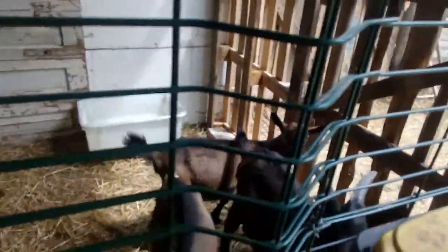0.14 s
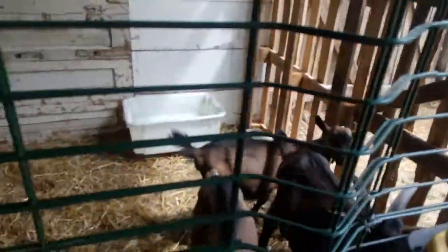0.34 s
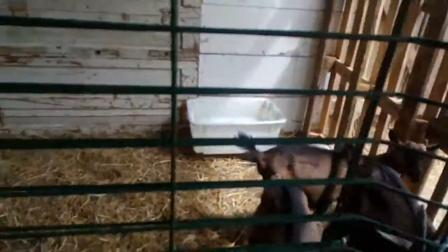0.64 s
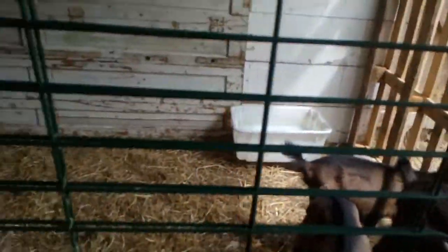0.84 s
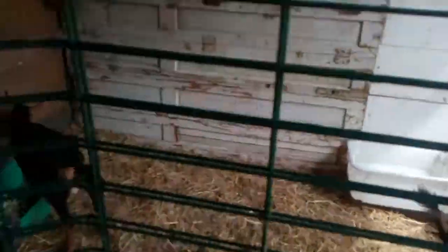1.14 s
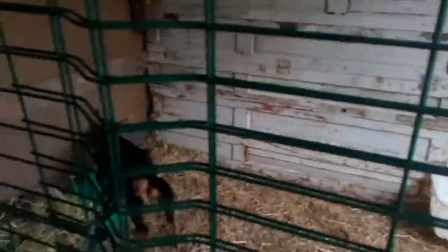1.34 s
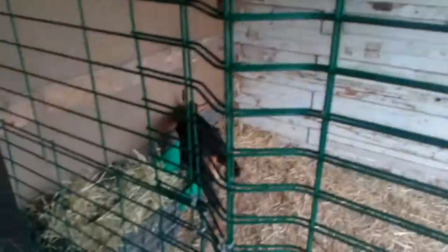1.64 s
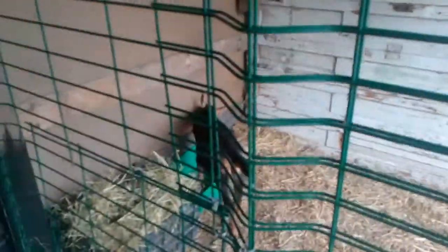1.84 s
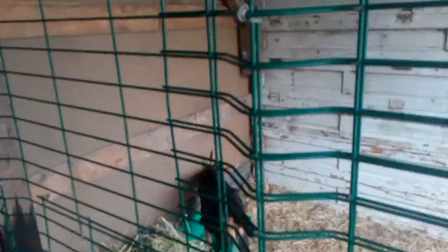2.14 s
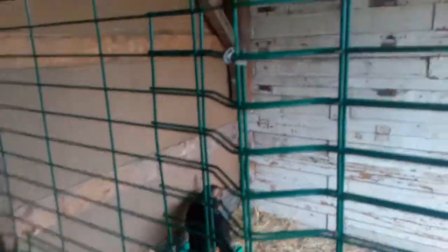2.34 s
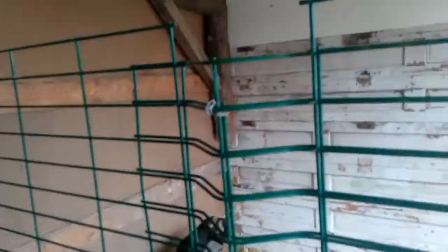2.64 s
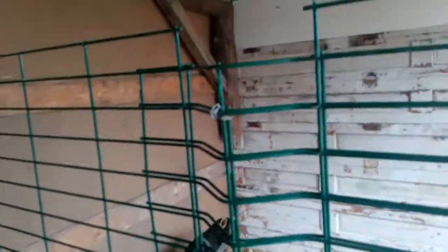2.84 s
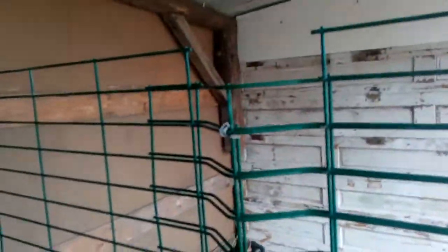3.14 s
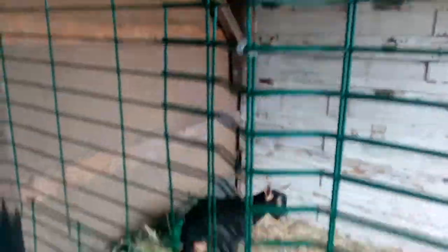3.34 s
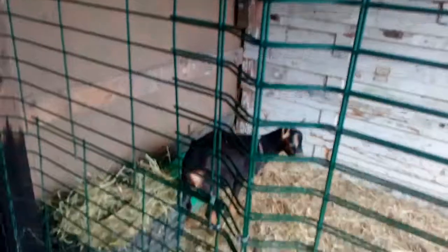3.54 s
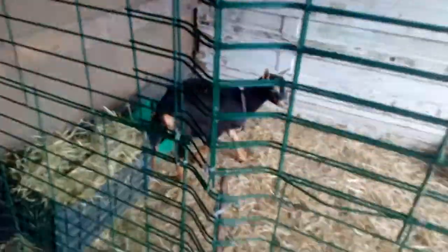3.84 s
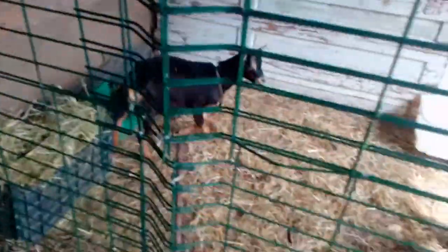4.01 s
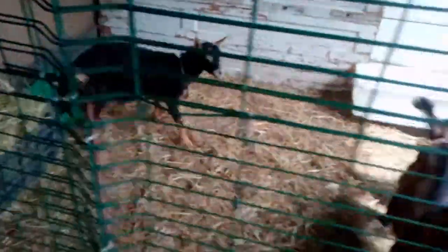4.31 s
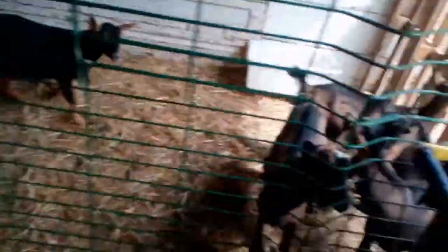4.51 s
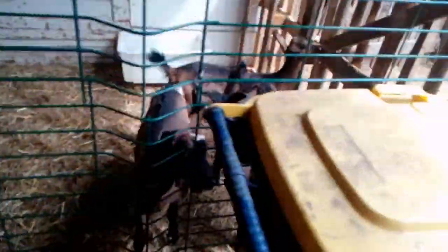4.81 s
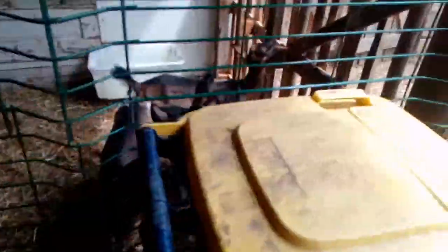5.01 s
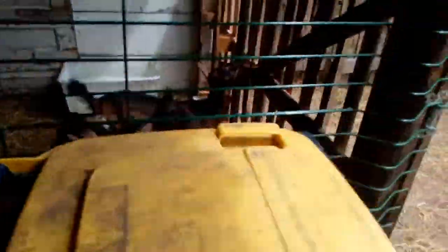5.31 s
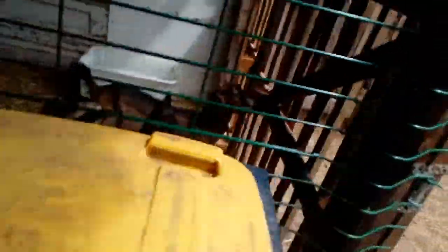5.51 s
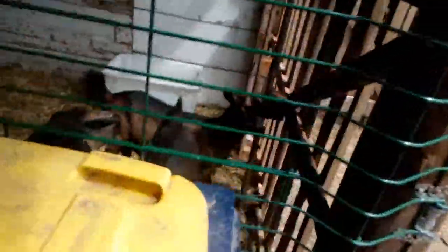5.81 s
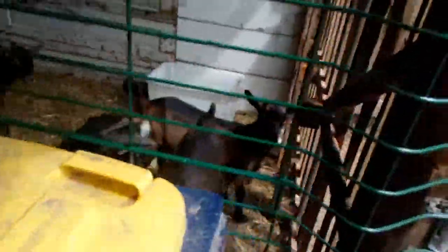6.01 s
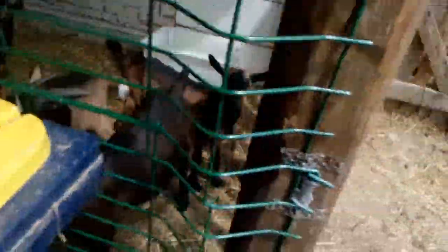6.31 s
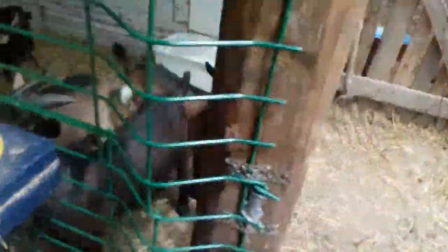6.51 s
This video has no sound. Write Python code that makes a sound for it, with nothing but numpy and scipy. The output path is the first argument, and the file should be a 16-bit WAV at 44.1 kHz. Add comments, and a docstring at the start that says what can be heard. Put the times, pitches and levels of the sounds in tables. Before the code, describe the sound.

Irregular wooden clatter and straw rustle in a small goat pen, short kid bleats, a wire clink, then a quavering goat bleat and quiet.

```python
"""Goats in a wooden shed, near a pocket camera, with the shuffling and hush of the yard (shaped noise) throughout.
From the start hooves and horns knock on boards (ringing modes, thud, crack); bodies scuff through straw
(swells of hiss) and far squeaks (sines with an octave) come and go. Near 2 s a kid gives six short bleats;
near 3 s a wire fence clinks (decaying sines) and a thin tone runs down. Past 4 s a goat gives one long quavering
bleat, then a kid bleats further off; these voices are vocal-fold harmonics and breath shaped by a throat."""
import sys
import numpy as np
from scipy import signal
from scipy.fft import rfft, irfft, next_fast_len
from scipy.io import wavfile
from scipy.ndimage import uniform_filter1d, map_coordinates

SR = 44100
rng = np.random.default_rng(int(sys.argv[2]) if len(sys.argv) > 2 else 0)


def to_wav(sig):
    """Store sig (one row per channel, or 1-D mono) as 16-bit WAV at the path in sys.argv[1].

    Samples outside -1..1 are clipped; the rate is SR.
    """
    pcm = np.clip(np.atleast_2d(sig), -1, 1) * 32767
    pcm = np.round(pcm).astype(np.int16)
    wavfile.write(sys.argv[1], SR, pcm.T)  # frames by channels


N = 293441
T = np.arange(N) / SR  # seconds


def amp(db):
    """Decibels to amplitude."""
    return 10 ** (np.asarray(db) / 20)


def unit(x):
    """Scale to an rms of 1."""
    return x / np.sqrt(np.mean(x ** 2) + 1e-20)


def along(points, hz):
    """Read (frequency, value) points on a log frequency axis."""
    f, v = np.transpose(points)
    return np.interp(np.log(hz + 1), np.log(f + 1), v)


def curves(rows):
    """One value per sample for each column after the time."""
    s, *columns = np.transpose(rows)
    return [np.interp(T, s, column) for column in columns]


def wobble(rate):
    """A smooth random curve with this many knots a second."""
    knots = rng.standard_normal(int(N * rate / SR) + 4)
    return map_coordinates(knots, [T * rate])


def filtered(x, response):
    """x times a complex response of frequency."""
    n = x.shape[-1]
    m = next_fast_len(n + 4096)
    return irfft(rfft(x, m) * response(np.fft.rfftfreq(m, 1 / SR)), m)[..., :n]


def placed(x, pan_db, lag_ms):
    """One sound at two microphone ports: left is louder by pan_db and later by lag_ms."""
    side = np.array([[.5], [-.5]])
    return filtered(x, lambda hz: amp(side * pan_db) * np.exp(-2j * np.pi * hz * side * lag_ms / 1000))


# How alike the two microphone ports hear a spread-out noise: (frequency [Hz], likeness [0-1])
PORT_LIKENESS = [(60, 0.64), (250, 0.84), (600, 0.47), (1200, 0), (3000, 0.038)]


def ports(pair, response):
    """Two unrelated noises become left and right: alike in the bass, unlike in the treble."""
    def mid_and_side(hz):
        turn = np.arccos(np.clip(along(PORT_LIKENESS, hz), 0, 1)) / 2
        return response(hz) * [np.cos(turn), np.sin(turn)]

    mid, side = filtered(pair, mid_and_side)
    return np.array([mid + side, mid - side])


def rush(spectrum, patchy_db, grit_db):
    """Stereo noise of rms 1 with patches of random gain and a crackling grain."""
    grit = amp(grit_db * uniform_filter1d(rng.standard_normal(N), size=40) * np.sqrt(40))
    z = signal.stft(grit * rng.standard_normal((2, N)), nperseg=512)[2]
    # smooth the patches over frequency, then over time
    field = uniform_filter1d(rng.standard_normal(z.shape[1:]), size=6, axis=0)
    field = uniform_filter1d(field, size=10, axis=1)
    pair = signal.istft(z * amp(patchy_db * unit(field)), nperseg=512)[1][:, :N]
    return unit(ports(pair, lambda hz: amp(along(spectrum, hz))))


# How long the shed's echo lasts: (frequency [Hz], t60 [s])
SHED = [(100, 0.39), (400, 0.15), (1500, 0.16), (6000, 0.086)]


def tail(size):
    """A fresh stereo answer of the shed; each frequency dies at its own speed."""
    hz, t, z = signal.stft(rng.standard_normal((2, size)), SR, nperseg=256)
    fade_db = -60 * t / along(SHED, hz)[:, None]
    echo = signal.istft(z * amp(fade_db), SR, nperseg=256)[1]
    delayed = np.pad(echo, ((0, 0), (200, 0)))
    echo = ports(delayed, np.ones_like)
    return echo / np.linalg.norm(echo[0])


# Mean levels of the yard's beds: (time [s], rumble [dB], shuffle [dB], rustle [dB])
YARD_LEVELS = [(0.0, -73.5, -44, -52), (.62, -67, -56, -54.5), (.78, -61, -57.5, -60),
               (1.408, -63, -60, -63), (1.93, -78, -48, -55), (1.96, -71, -55.5, -60.5),
               (2.8, -72.5, -60, -60.5), (3.55, -72.5, -64.5, -62.5), (4.1, -68.5, -62.5, -64),
               (5.0, -66.5, -56.5, -57.5), (5.35, -61.5, -61.5, -60.5), (5.86, -69.5, -67, -60.5),
               (6.65, -68, -65, -61.5)]
# Colour of the low rumble: (frequency [Hz], relative density [dB])
RUMBLE_COLOUR = [(15, -39), (25, -12.5), (66, 2), (177, -9), (250, -20.5), (320, -19), (550, -120)]
# Colour of the shuffling, in yard and straw: (frequency [Hz], relative density [dB])
SHUFFLE_COLOUR = [(88, -19.5), (150, -11), (242, -8.5), (512, -7), (684, -9), (767, -6.5), (1800, -16.5),
                  (2340, -19), (3960, -120)]
# Colour of the yard's far hiss: (frequency [Hz], relative density [dB])
HUSH_COLOUR = [(880, -37.5), (1500, -19), (2400, -3), (3200, -1), (5340, -0.5), (6220, -5.5), (8500, -33.5),
               (11000, -66), (18700, -120)]
# Colour of the topmost hiss, in yard and straw: (frequency [Hz], relative density [dB])
AIR_COLOUR = [(5000, -45.5), (8500, 1.5), (10600, 4.5), (14100, 7.5), (15500, -2.5)]


def yard():
    """Animals shift about; four beds of noise share one unrest."""
    rumble_db, shuffle_db, rustle_db = curves(YARD_LEVELS)
    stir = wobble(7.5)
    air_db = -83.0 + 0.64 * (rustle_db + 56.0) + 1.4 * stir
    rumble_db = rumble_db + 0.93 * stir + 2.5 * wobble(16)
    shuffle_db = shuffle_db + 1.4 * stir + 1.2 * wobble(20)
    rustle_db = rustle_db + stir + 0.45 * wobble(34)
    return (amp(rumble_db) * rush(RUMBLE_COLOUR, patchy_db=2, grit_db=.5)
            + amp(shuffle_db) * rush(SHUFFLE_COLOUR, patchy_db=2.5, grit_db=1.5)
            + amp(rustle_db) * rush(HUSH_COLOUR, patchy_db=2, grit_db=1)
            + amp(air_db) * rush(AIR_COLOUR, patchy_db=1, grit_db=0))


def uneven_tone(hz, t):
    """Boards are uneven: a sine whose phase wanders, the more the higher it is."""
    width = .045  # of the ringing pitch, over the pitch
    steps = rng.standard_normal(np.broadcast(hz, t).shape) * np.sqrt(2 * np.pi * width * hz / SR)
    wander = uniform_filter1d(np.cumsum(steps, axis=-1), size=90, axis=-1, mode="nearest")
    return np.sin(2 * np.pi * hz * t + wander)


CHATTER_S = 0.015  # how long a loose board chatters


def chatter(t):
    """Envelope of the moment in which the loose board chatters."""
    return np.exp(-(t / CHATTER_S) ** 4)


# Modes of the boards: (pitch [Hz], mean level [dB], relative t60, scaled by each knock's t60 over 0.26 s [s])
BOARD_MODES = [(240.5, 15, 0.076), (269.5, 4, 0.18), (342.4, -2, 0.62), (396.8, 9, 0.18),
               (462.7, -0.5, 0.34), (504, -14, 0.054), (622, -17.5, 0.12), (713, 2, 0.25),
               (849, -17.5, 0.19), (1038, -11, 0.19), (1130, -18, .1), (1480, 0, 0.058), (1658, 8, 0.16)]


def boards(t, spot_hz, t60, high_hz, high_db):
    """A blow rings the board modes, most near two pitches of the struck spot."""
    def near_spot(f):
        return amp(-12 * np.log2(f / spot_hz) ** 2) + amp(high_db - 40 * np.log2(f / high_hz) ** 2)

    hz, level, life = np.transpose(BOARD_MODES)[:, :, None]
    mode_db = level + 5.9 * rng.standard_normal(hz.shape) - 60 * t / (t60 * life / 0.26)
    modes = uneven_tone(hz * rng.normal(1, 0.026, hz.shape), t)
    ring = (near_spot(hz) * amp(mode_db) * modes).sum(0)
    spot = 3.1 * uneven_tone(spot_hz, t) + amp(high_db + 11.5) * uneven_tone(high_hz, t)
    ring += amp(-60 * t / t60) * spot
    # weaker contacts follow the first
    contacts = .3 * chatter(t) * rng.standard_normal(len(t)) * (rng.random(len(t)) < 200 / SR)
    contacts[0] = 1
    wood = signal.fftconvolve(ring, contacts)[:len(t)]
    # countless weak modes of the pen blur into noise of the same colour
    blur = unit(filtered(rng.standard_normal(len(t)), lambda f: near_spot(f + 1) * (f > 90)))
    blur *= 0.12 * chatter(t) + 0.24 * amp(-60 * t / (1.15 * t60))
    # the hoof comes to rest on the board and damps it
    damped = 0.87 + 1.03 * np.exp(-(t / (2.8 * CHATTER_S)) ** 6)
    return damped * wood / np.abs(wood).max() + blur


# Colour of the boom of the shed's frame: (frequency [Hz], relative level [dB])
FRAME_COLOUR = [(30, -23.5), (60, 0), (100, 11), (140, -3.5), (250, -61)]


def thud(t, db, hz, t60):
    """A dull low tone, and the shed's frame booming after the blow as low noise."""
    tone = amp(db - 60 * t / t60) * uneven_tone(hz, t) * (1 - np.exp(-t / 0.00089))
    boom = unit(filtered(rng.standard_normal(len(t)), lambda f: amp(along(FRAME_COLOUR, f))))
    return tone + amp(-26.5 - 60 * t / 0.35) * boom


# Colour of the dry crack: (frequency [Hz], relative level [dB])
CRACK_COLOUR = [(600, -21), (1300, 1), (3000, -5), (5500, -9), (7000, -18), (8500, -42.5), (15000, -64.5)]


def crack(t, db, t60):
    """A dry burst of noise that fades in three stages."""
    grain = unit(ports(rng.standard_normal((2, len(t))), lambda f: amp(along(CRACK_COLOUR, f))))
    fade = amp(-60 * t / 0.026) + .5 * chatter(t) + 0.34 * amp(-60 * t / t60)
    return amp(db - 5) * grain * fade


# Blows on the boards: (time [s], level [dB], pitch of the struck spot [Hz], its t60 [s], second pitch [Hz],
# its relative level [dB], relative crack level [dB], relative thud level [dB], thud pitch [Hz], thud t60 [s])
KNOCKS = [(0.007, -23.5, 596, 0.05, 880, -10, -15.5, -23, 216, .06),
          (0.144, -30.5, 337, .08, 842, -4, -9.5, -26, 125, .1),
          (0.217, -36, 1252, 0.15, 852, -14, -2, -19, 197, .1),
          (0.261, -37.5, 300, 0.074, 852, -24, -9, -9, 103, 0.18),
          (0.394, -36, 810, 0.064, 850, -9, -1.5, -9, 159, .12),
          (0.647, -22.5, 729, 0.11, 1170, -29, -10.5, -6, 245.3, 0.21),
          (0.82, -11, 383, 0.074, 654, -4.5, -14, -14.5, 224, 0.11),
          (0.835, -19, 238.3, 0.18, 706, 0.5, -13, -21, 100, .25),
          (1.292, -38.5, 196, 0.034, 852, -32, -39, 15, 115, 0.083),
          (1.303, -26, 188, 0.038, 850, -48, -39, 11, 151, .06),
          (1.337, -16, 736, 0.094, 555, -7, -6, -2, 240.5, 0.077),
          (1.378, -29, 328, 0.081, 720, -13, -22, -5, 106.5, 0.27),
          (1.584, -20.5, 445, 0.054, 1037, -7.5, -16.5, -1.5, 239, 0.025),
          (1.611, -28.5, 453, 0.058, 960, -25, -12.5, -11.5, 105, 0.32),
          (2.153, -17, 263, 0.066, 528, -9, -15, -9.5, 135, .12),
          (2.165, -27.5, 743, 0.093, 1116, -5.5, -11, -23, 135, .1),
          (2.215, -20.5, 233.4, 0.046, 476, -2, -16.5, -20, 180, .06),
          (2.235, -30.5, 850, 0.053, 480, -29, -17, -14, 200, .05),
          (3.068, -19.5, 329, 0.053, 787, -1, -16, -7.5, 227.5, .09),
          (3.084, -23, 662, 0.042, 835, -6, -14, -24, 93, .25),
          (3.107, -29.5, 744, 0.17, 1180, -17, -5, -12, 222, 0.11),
          (3.428, -21.5, 386, 0.15, 745, -8.5, -32, 2.5, 219, 0.088),
          (3.468, -15, 693, 0.074, 447, -20.5, -22, -31, 226, .08),
          (3.481, -21, 684, 0.055, 1094, -16.5, -25, -10, 228, 0.074),
          (5.991, -57, 135, 0.13, 864, -24, -30, -2, 100.5, 0.14),
          (6.165, -43.5, 537, .08, 940, -8, -20, -14, 200, 0.072),
          (6.33, -61.5, 109, 0.072, 852, -27, -30, 18, 70, 0.11)]
# A body leans on the ringing boards and stills them: (time [s], loss [dB])
STOPS = [(3.137, 13), (3.497, 7)]


def knocks():
    """Each hoof or horn blow rings the boards with a thud and a crack; the shed answers."""
    out, t = np.zeros((2, N + 2 * SR)), np.arange(SR // 3) / SR
    lead = 64  # samples of room for the earlier port
    for s, db, spot_hz, t60, high_hz, high_db, crack_db, thud_db, thud_hz, thud_t60 in KNOCKS:
        body = boards(t, spot_hz, t60, high_hz, high_db) + thud(t, thud_db, thud_hz, thud_t60)
        stilled_db = sum(loss * np.clip((s + t - stop) / .004, 0, 1) for stop, loss in STOPS if s < stop)
        rise = amp(db - stilled_db) * (1 - np.exp(-t / 0.0018)) ** 2
        direct = placed(np.pad(rise * body, (lead, 0)), pan_db=-1, lag_ms=0.17)
        direct += np.pad(rise * crack(t, crack_db, t60), ((0, 0), (lead, 0)))
        echo = signal.fftconvolve(direct, tail(size=SR // 3), axes=1)
        start = round(s * SR)
        out[:, start:start + direct.shape[1]] += direct
        out[:, start:start + echo.shape[1]] += amp(-6) * echo
    # thin the deepest bass, below about 55 Hz
    return filtered(out[:, lead:N + lead], lambda f: (1j * f / (55 + 1j * f)) ** 2)


# Scuffs in the straw: (time of the middle [s], length [s], hiss level [dB], shuffle level over the hiss [dB])
SCUFFS = [(0.41, 0.18, -55.5, 10.5), (0.562, 0.36, -48.5, 3), (1.017, 0.24, -58, 1),
          (1.113, 0.07, -61, 2.5), (1.665, 0.17, -54.5, 7.5), (1.738, 0.035, -62, 14.5),
          (1.889, 0.078, -56, -6), (2.032, 0.037, -51, -10), (2.173, 0.11, -51.5, 12),
          (2.403, 0.0041, -41, -20), (2.604, 0.25, -49, -5), (3.12, 0.067, -57.5, 20),
          (3.325, 0.14, -49, 4), (3.393, 0.092, -64, 17.5), (3.464, 0.07, -51, 19),
          (3.575, 0.066, -60.5, 6.5), (3.872, 0.18, -56, -23.5), (4.071, 0.24, -58, -3),
          (4.326, 0.064, -48.5, 2), (5.107, 0.15, -60.5, -5), (5.706, 0.12, -56.5, -11),
          (6.165, 0.34, -58, -5.5), (6.558, 0.15, -54.5, -8.5)]
# Colour of the straw's hiss: (frequency [Hz], relative density [dB])
RUSTLE_COLOUR = [(880, -49), (1500, -14), (2420, -2), (3170, -2.5), (5340, 0.5), (6220, -3.5),
                 (8500, -30.5), (11000, -60), (18700, -120)]


def straw():
    """Bodies scuff through straw: swells of crackling hiss over a lower shuffle."""
    hiss, low = np.zeros(N), np.zeros(N)
    for s, length, db, low_db in SCUFFS:
        swell = amp(db) * np.exp(-(4.02 * (T - s) / length) ** 2)
        hiss += swell
        low += swell * amp(low_db)
    return (amp(-29) * hiss * rush(AIR_COLOUR, patchy_db=-1, grit_db=3.5)
            + hiss * rush(RUSTLE_COLOUR, patchy_db=1.5, grit_db=3)
            + low * rush(SHUFFLE_COLOUR, patchy_db=2, grit_db=3))


# Far squeaks: (start time [s], end time [s], first pitch [Hz], last pitch [Hz], mean level [dB],
# mean octave level over it [dB])
SQUEAKS = [(0.55, 0.656, 330, 294, -50.5, -16), (3.639, 3.708, 4240, 4020, -64, -42),
           (3.861, 4.059, 2620, 2660, -67, -40), (4.287, 4.583, 947, 994, -51, -31),
           (5.023, 5.364, 469, 495, -66.5, -22), (5.484, 5.609, 1172, 1092, -63.5, -15),
           (5.984, 6.155, 1273, 1300, -71, -33), (6.176, 6.304, 1280, 1255, -68.5, -30),
           (6.303, 6.468, 1183, 1200, -68, -33), (6.414, 6.547, 690, 922, -59.5, -13),
           (6.492, 6.585, 986, 1004, -58.5, -29), (6.58, 6.683, 934, 930, -61, -14)]


def squeaks():
    """Faint hoarse tones from further off, each gliding with its octave."""
    out = np.zeros(N)
    for start, end, first_hz, last_hz, db, octave_db in SQUEAKS:
        u = np.clip((T - start) / (end - start), 0, 1)
        hz = first_hz + (last_hz - first_hz) * u + 24 * wobble(200)
        phase = 2 * np.pi * np.cumsum(hz) / SR
        flicker_db = 4 * wobble(60)
        swell = amp(db + flicker_db) * np.sin(np.pi * u).clip(0) ** 0.43
        out += swell * (np.sin(phase) + amp(octave_db + flicker_db / 2) * np.sin(2 * phase))
    return out


def voice(rows, throat, jitter, rough, pan_db):
    """Vocal-fold harmonics through the throat, blurred by breath noise that swells once a cycle.

    rows: (time [s], pitch [Hz], first harmonic [dB], second harmonic [dB], mouth band [dB], nasal treble [dB])
    """
    rows = np.array(rows)
    live = (T > rows[0, 0]) & (T < rows[-1, 0])
    t = T[live] - rows[0, 0]

    def smooth(column):
        return uniform_filter1d(np.interp(T, rows[:, 0], column), size=300)[live]

    def knots(rate):
        """One smooth random curve for each port."""
        where = np.broadcast_arrays([[0], [1]], rate * t + 1)
        return map_coordinates(rng.standard_normal((2, 99)), where, order=3)

    def breath(low_hz, high_hz):
        noise = rng.standard_normal((2, len(t)))
        return unit(filtered(noise, lambda f: amp(along(throat, f)) * (f > low_hz) * (f < high_hz)))

    pitch_hz = smooth(rows[:, 1])
    first, second, mouth, nose = [amp(smooth(column)) for column in rows[:, 2:].T]
    phase = 2 * np.pi * np.cumsum(pitch_hz * (1 + jitter * wobble(260)[live])) / SR
    low = first * np.sin(phase) + second * amp(4.5 * knots(30)) * np.sin(2 * phase + 1)
    low = low * np.sqrt(2) * amp(knots(25))
    early = np.exp(-(t / .4) ** 2)
    sharp = 1 - .15 * early  # the throat's resonances are blunt until the voice clears
    upper = 0
    for k in range(3, 28):
        band = mouth if k < 7 else nose if k > 8 else np.sqrt(mouth * nose)
        # a moving head: each overtone reaches each port with its own drifting strength and phase
        drift = min(k / 8, 1) * 2 * knots(11.63)
        throat_db = sharp * (along(throat, k * pitch_hz) + 6) - 6
        upper += band * amp(throat_db + 3.2 * knots(42)) * np.sin(k * phase + k * k * .3 + drift)
    # the folds close unevenly: alternate cycles differ, in fits, and put lines between the overtones
    hoarse = rough * (1 + .5 * early)
    uneven = .28 * hoarse * np.abs(knots(20)[0]) * np.cos(phase / 2 + knots(30)[0])
    out = upper * (1 + uneven) + low * (1 + .2 * uneven)
    treble = .8 * breath(1900, 7600) + .6 * breath(3600, 7600)
    air = nose * treble + 0.7 * mouth * breath(380, 1900)
    out += hoarse * air * (1 + 0.44 * np.cos(phase))
    full = np.zeros((2, N))
    full[:, live] = out * amp([[pan_db / 2], [-pan_db / 2]])
    return full


# Share of the nasal treble's gain that follows as the mouth opens: [second harmonic, mouth band]
MOUTH_OPENS = [0.24, 0.4]


def short_bleats(table, throat, second_db, rough):
    """Short syllables, each a swell with a gliding pitch; the mouth's opening differs between them."""
    length_s, edge_db = .085, 24
    rows = []
    for s, first_hz, last_hz, db, treble in table:
        over = [0, second_db + MOUTH_OPENS[0] * treble, MOUTH_OPENS[1] * treble, treble]
        levels = db + np.array(over)
        for u in np.linspace(0, 1, num=9):
            pitch_hz = first_hz + (last_hz - first_hz) * u ** 0.55
            rows.append((s + (u - .5) * length_s, pitch_hz, *(levels - edge_db * (2 * u - 1) ** 2)))
    return voice(sorted(rows), throat, jitter=.007, rough=rough, pan_db=-1)


# The kid's syllables: (time of the middle [s], first pitch [Hz], last pitch [Hz], first harmonic level [dB],
# nasal treble over it [dB])
KID = [(1.953, 279.5, 252.5, -53, -54), (2.025, 289.7, 297, -49, -11.5), (2.137, 296.3, 343.3, -50, 0.5),
       (2.254, 327.6, 337.6, -52.5, 8.5), (2.357, 315, 339.8, -54.5, 11.5), (2.468, 303, 331.2, -60, 11.5)]
# The kid's throat: (frequency [Hz], relative level [dB])
KID_THROAT = [(600, -4), (1000, 0), (1900, -9.5), (2400, -6.5), (2900, -10.5), (3380, 2), (3800, -18),
              (4600, 1), (5400, -14), (6200, -10), (7500, -38)]


def kid():
    """Six short bleats whose treble opens up from the first to the last."""
    return short_bleats(KID, KID_THROAT, second_db=-8.5, rough=0.76)


# Modes of the wire fence: (pitch [Hz], mean level [dB], t60 [s])
WIRE_MODES = [(1534, 0, .05), (1710, 5, 0.072), (2130, 0.5, 0.042), (2880, 2.5, 0.091), (3830, -17, .05),
              (4860, -2, 0.066)]
# The fence shakes: (time [s], level [dB])
CLINKS = [(3.069, -39.5), (3.103, -39.5), (3.116, -43.5)]


def fence():
    """Wire panels clink when a board beside them is hit: a few high modes die fast."""
    out, t = np.zeros(N), np.arange(SR // 8) / SR
    for s, db in CLINKS:
        ring = 0
        for hz, level, t60 in WIRE_MODES:
            ring += amp(level + rng.normal(0, 1.7) - 60 * t / t60) * np.sin(2 * np.pi * hz * t)
        out[round(s * SR):][:len(t)] += amp(db) * ring * (1 - np.exp(-t / 0.0011))
    return placed(out, pan_db=-3.5, lag_ms=0.12)


# A thin tone that runs down, all but silent before 3 s: (time [s], mean pitch [Hz], mean level [dB])
WHINE = [(0, 8270, -91), (2, 8100, -89), (3.07, 7860, -85), (3.12, 7750, -86), (3.3, 7350, -74.5),
         (3.55, 5800, -69.5), (3.8, 4800, -78), (3.85, 5200, -130)]


def whine():
    """One gliding sine, its pitch fuzzier as it falls from where it began."""
    hz, db = curves(WHINE)
    fuzz_hz = .15 * (hz[0] - hz) * wobble(300)
    return amp(db + 4 * wobble(12)) * np.sin(2 * np.pi * np.cumsum(hz + fuzz_hz) / SR)


# The goat's quaver, one row a push of breath: (start time [s], tightest time [s], top pitch [Hz], level [dB],
# second harmonic over it [dB], slack before the push [0-1])
PUSHES = [(4.143, 4.203, 242, -51.5, 6, 1), (4.267, 4.316, 274.2, -44.5, -1.5, 0.94),
          (4.376, 4.429, 271.5, -44, -2, 0.77), (4.484, 4.538, 278.7, -43.5, -2, 0.59),
          (4.591, 4.639, 284, -42.5, -13.5, 0.38), (4.685, 4.731, 283.1, -43.5, -3.5, 0.36),
          (4.788, 4.839, 278.8, -43.5, -10, 0.14), (4.883, 4.942, 273, -44.5, -7.5, 0.46),
          (4.965, 4.99, 263, -47, 3, .2)]
# The goat's throat: (frequency [Hz], relative level [dB])
GOAT_THROAT = [(650, 4.5), (830, 3), (1080, 1.5), (1450, -4.5), (1700, -5), (2200, -13.5), (2800, -7.5),
               (3080, 4.5), (3350, -17), (3600, -11), (4230, -1.5), (4700, -6.5), (5300, -6), (6400, -9.5),
               (7500, -33)]
# Loss at full slack: [first harmonic, second harmonic, mouth band, nasal treble] [dB]
SLACK_LOSS_DB = [62, 19.7, 9.7, 12.4]
# Power of the slack in that loss, same order; the low harmonics hold until the folds nearly part
SLACK_POWER = [2.4, 1.5, 0.64, 0.69]


def goat():
    """One long bleat; between pushes of breath the folds slacken, so pitch and level sag together."""
    end_s, end_slack = 5.03, 0.28
    relax_s = .04  # longest time from tightest back to slack
    push_flat, climb_flat = 2.6, 1.5  # pitch climbs back more evenly than the level
    sag_hz = 44.06  # pitch lost at full slack
    start, tight, top_hz, level, second, slack = np.transpose(PUSHES)
    t = np.linspace(start[0], end_s, num=240)
    k = np.searchsorted(start, t, side="right") - 1
    rising = t < tight[k]
    to_go = np.abs((tight[k] - t) / (tight - start)[k])
    relax = np.minimum(np.append(start[1:], end_s) - tight, relax_s)
    slackened = np.clip((t - tight[k]) / relax[k], 0, 1) ** push_flat
    falling_slack = np.append(slack[1:], end_slack)[k] * slackened
    loose = np.where(rising, slack[k] * to_go ** push_flat, falling_slack)
    pitch_slack = np.where(rising, slack[k] * to_go ** climb_flat, falling_slack)
    pitch = np.interp(t, tight, top_hz) - sag_hz * pitch_slack
    # the breath runs out in the last 0.08 s
    effort = np.interp(t, tight, level) - 18 * np.clip(1 - (end_s - t) / .08, 0, 1)
    # below 235 Hz the first harmonic thins by 2 dB per Hz
    first_db = -2 * np.maximum(235 - pitch, 0)
    # the low throat lifts the second harmonic while a push rises through 498 Hz
    lift_db = rising * 7 * np.exp(-((2 * pitch - 498) / 21) ** 2)
    second_db = np.interp(t, tight, second) + lift_db
    mouth_db, nose_db = -5.5, -1.5
    over = [first_db, second_db, mouth_db, nose_db]
    bands = [effort + db - loss * loose ** power for db, loss, power in zip(over, SLACK_LOSS_DB, SLACK_POWER)]
    return voice(np.transpose([t, pitch, *bands]), GOAT_THROAT, jitter=.006, rough=.7, pan_db=-2)


# A kid further off: (time of the middle [s], first pitch [Hz], last pitch [Hz], first harmonic level [dB],
# nasal treble over it [dB])
FAR_KID = [(5.32, 255, 250.4, -77, 14), (5.455, 265, 259.6, -71, 7), (5.57, 262, 260.3, -74.5, 7),
           (5.71, 262, 265.5, -78, 6), (6.185, 264, 273, -62.5, -23), (6.315, 264, 264, -68, -22)]
# Its throat as heard from afar: (frequency [Hz], relative level [dB])
FAR_THROAT = [(780, 6), (1300, -8), (1700, -16), (2080, 4), (2350, -15), (2650, 1), (3300, -15),
              (7500, -32)]


def far_kid():
    """Another kid's short bleats, fainter and less hoarse."""
    return short_bleats(FAR_KID, FAR_THROAT, second_db=6, rough=.4)


def scene():
    """Voices with the shed's echo, knocks, fence, and the beds a little to the right."""
    voices = goat() + kid() + far_kid() + squeaks()
    echo = signal.fftconvolve(voices, tail(size=SR // 3), axes=1)[:, :N]
    voices += amp(-11) * echo
    beds = amp([[-.4], [.4]]) * (straw() + yard() + whine())
    return voices + knocks() + fence() + beds


def record(dry):
    """The camera keeps nothing above its band limit of 15.5 kHz."""
    return filtered(dry, lambda hz: hz < 15500)


dry = scene()
out = record(dry)
to_wav(out)
```